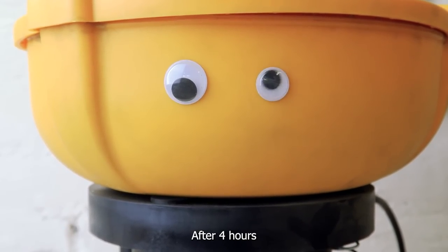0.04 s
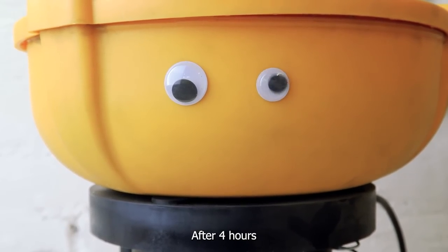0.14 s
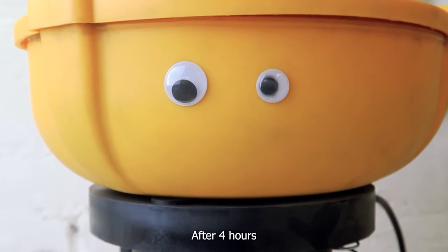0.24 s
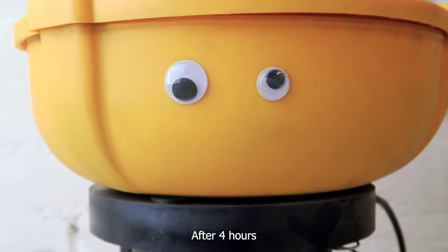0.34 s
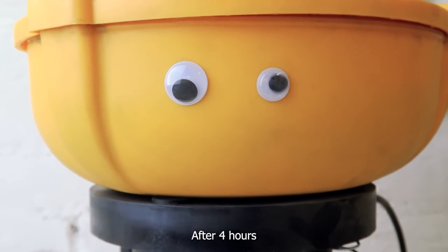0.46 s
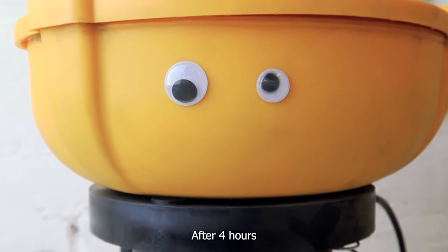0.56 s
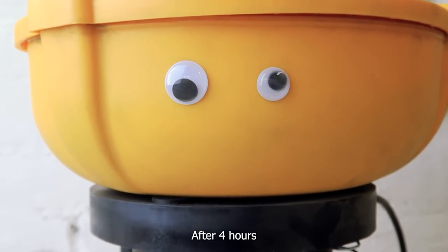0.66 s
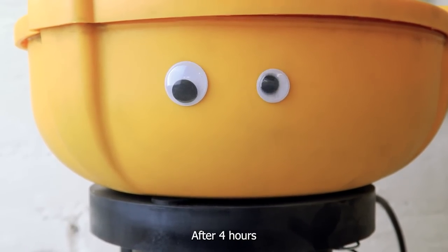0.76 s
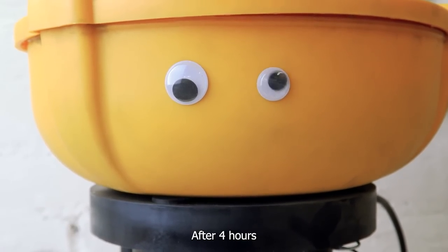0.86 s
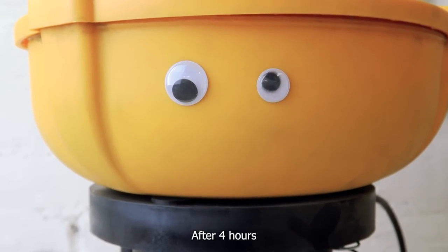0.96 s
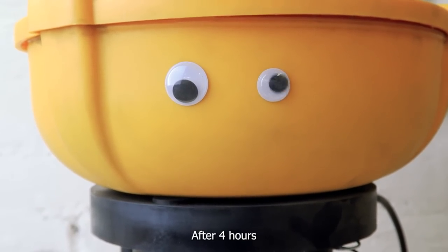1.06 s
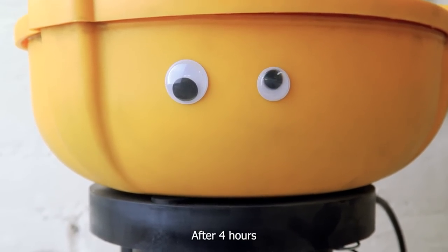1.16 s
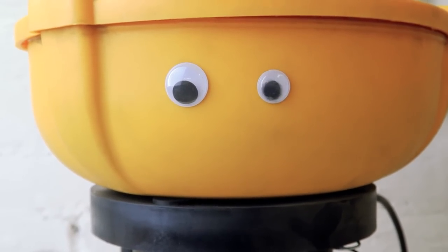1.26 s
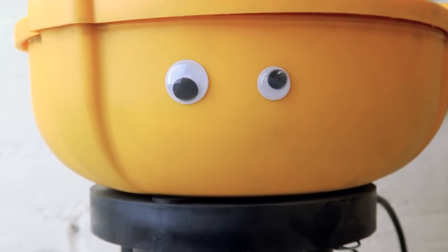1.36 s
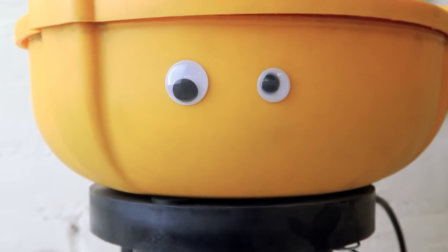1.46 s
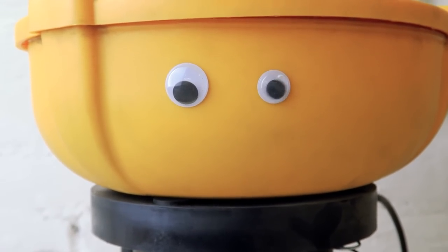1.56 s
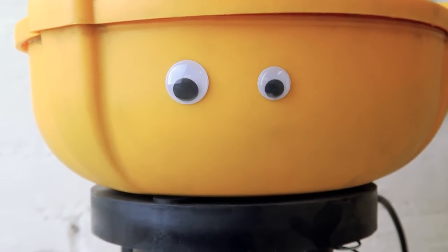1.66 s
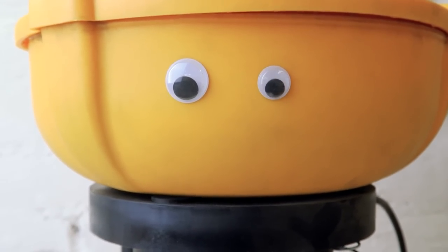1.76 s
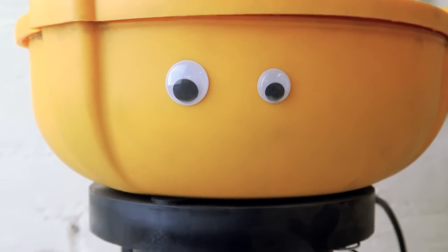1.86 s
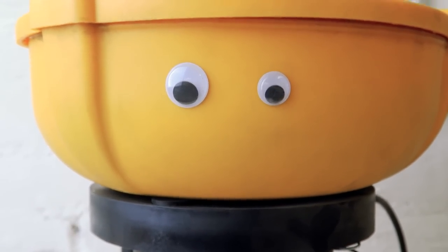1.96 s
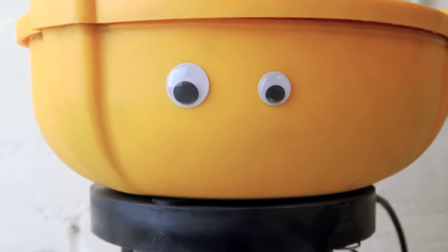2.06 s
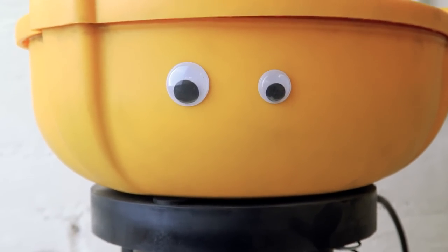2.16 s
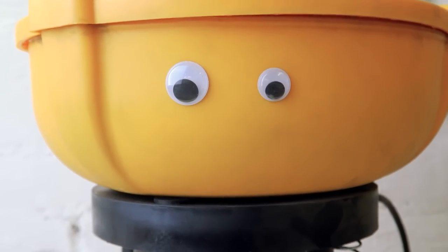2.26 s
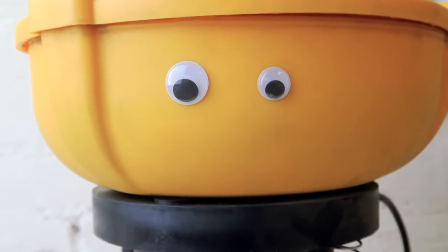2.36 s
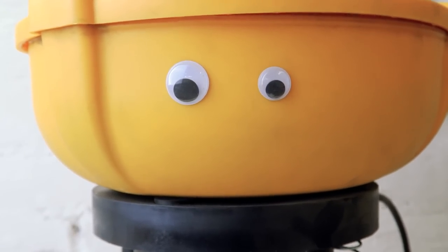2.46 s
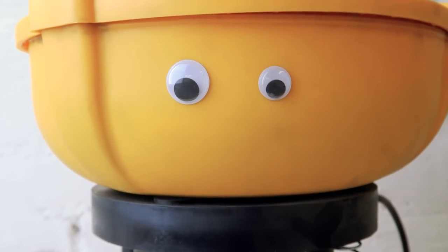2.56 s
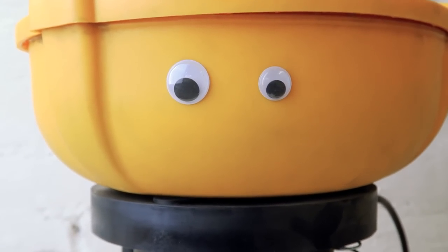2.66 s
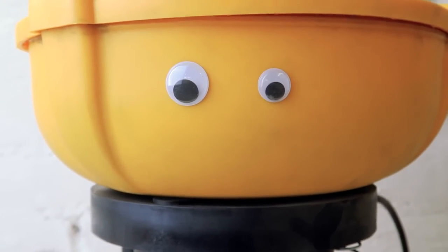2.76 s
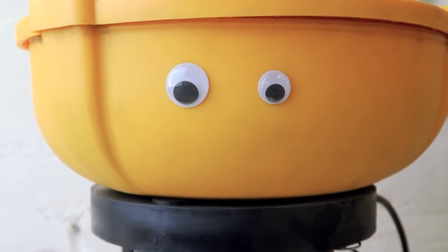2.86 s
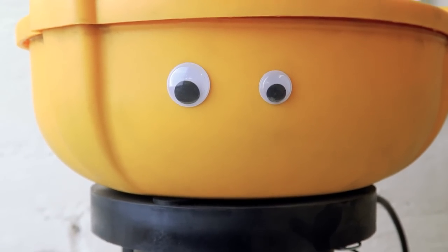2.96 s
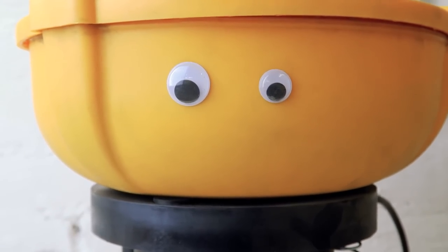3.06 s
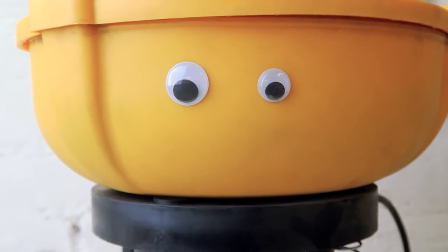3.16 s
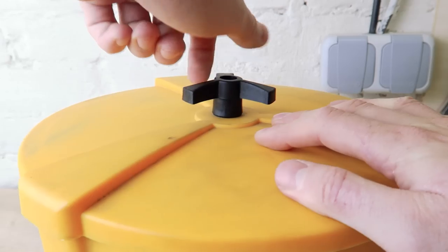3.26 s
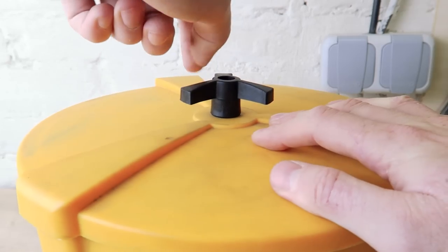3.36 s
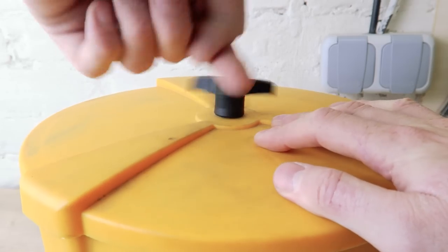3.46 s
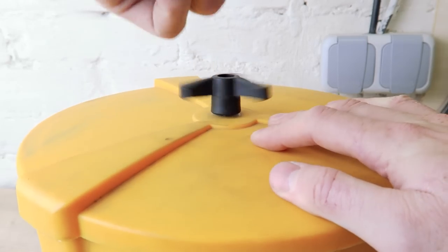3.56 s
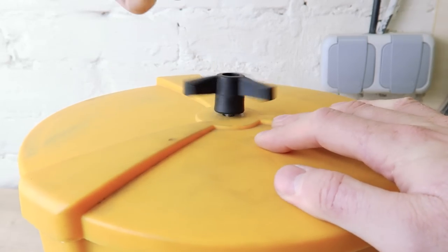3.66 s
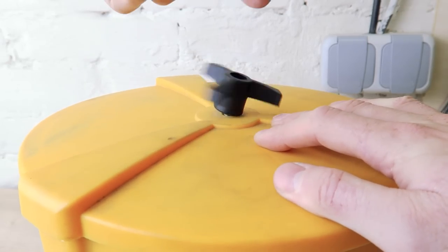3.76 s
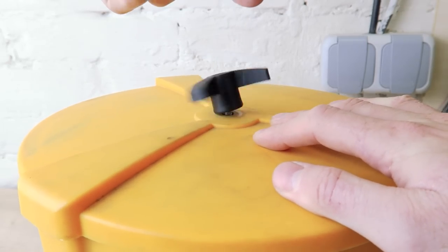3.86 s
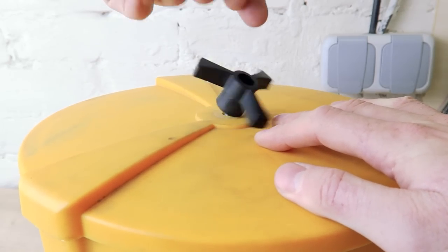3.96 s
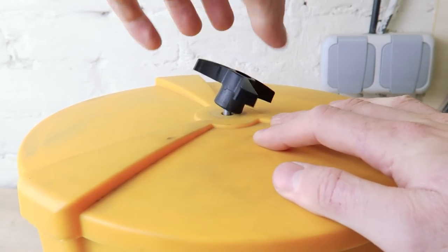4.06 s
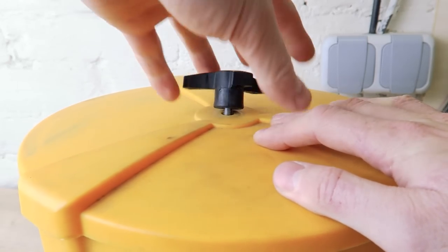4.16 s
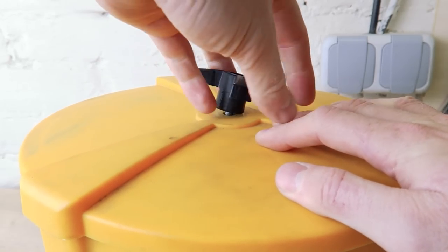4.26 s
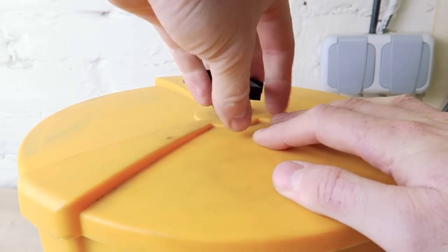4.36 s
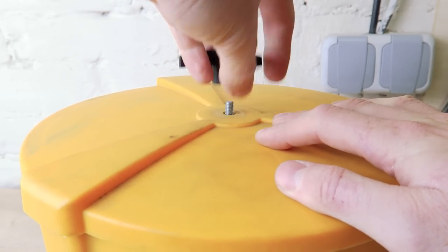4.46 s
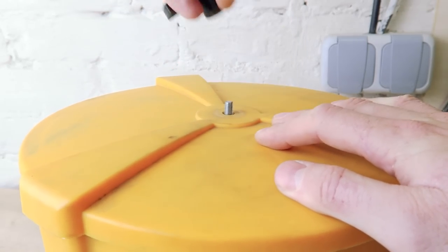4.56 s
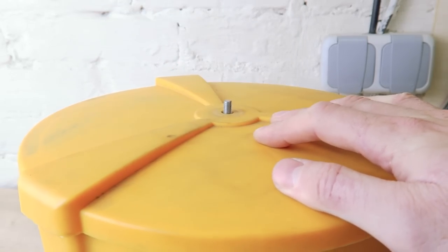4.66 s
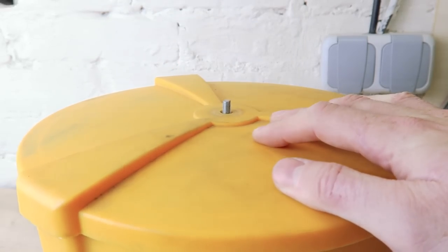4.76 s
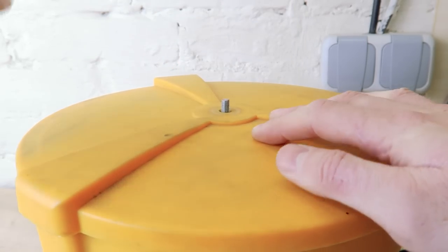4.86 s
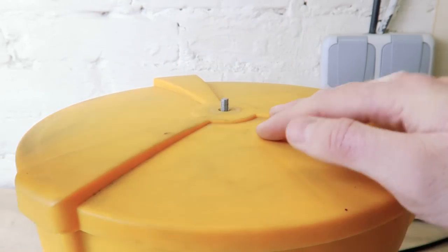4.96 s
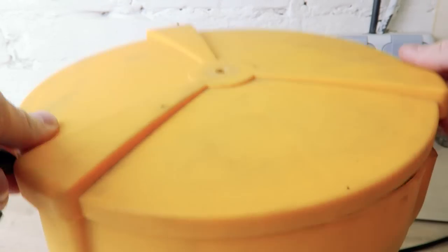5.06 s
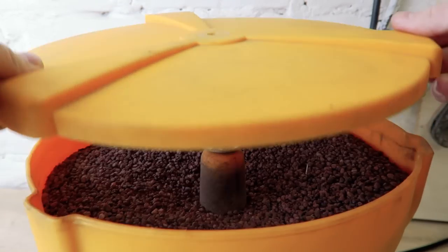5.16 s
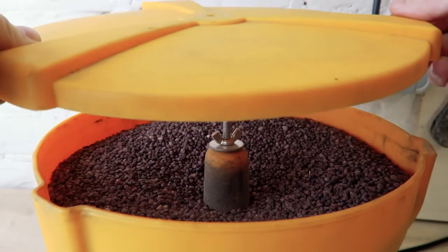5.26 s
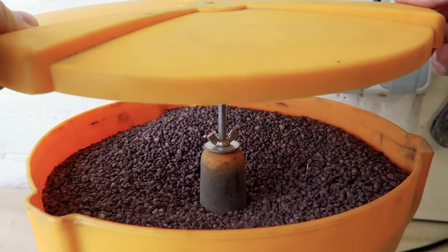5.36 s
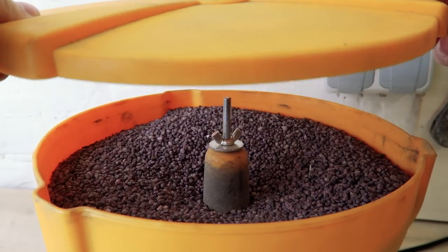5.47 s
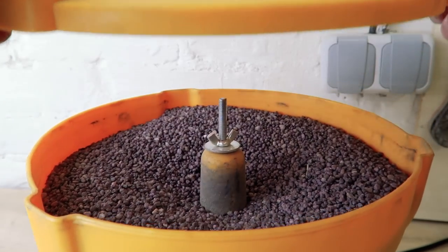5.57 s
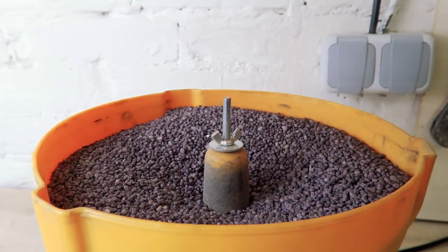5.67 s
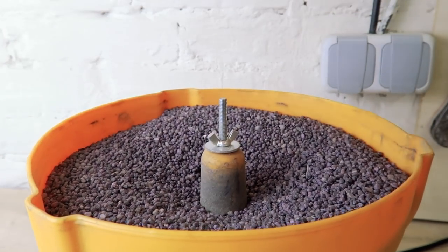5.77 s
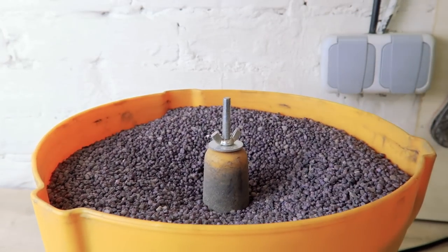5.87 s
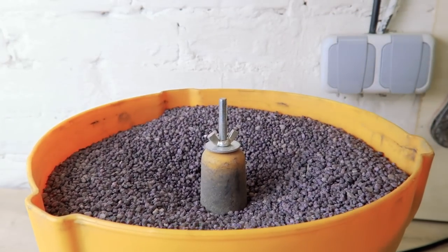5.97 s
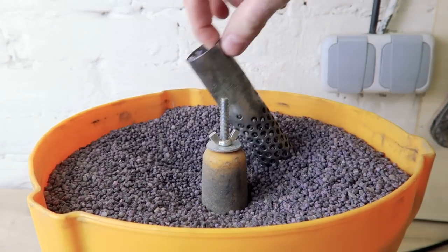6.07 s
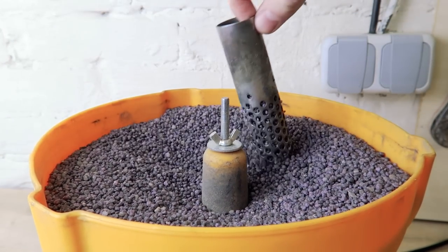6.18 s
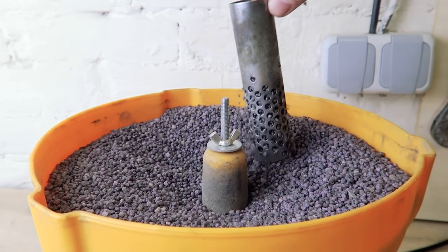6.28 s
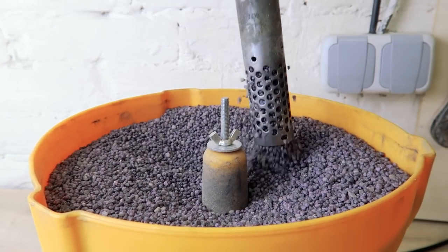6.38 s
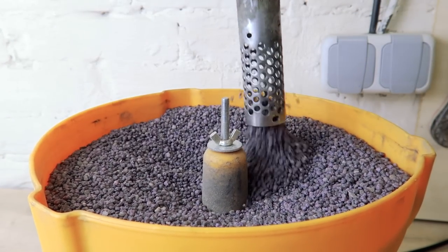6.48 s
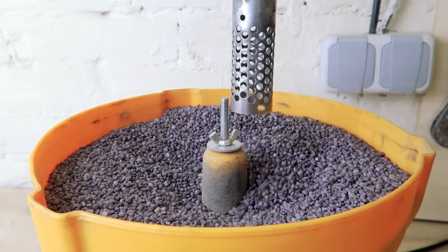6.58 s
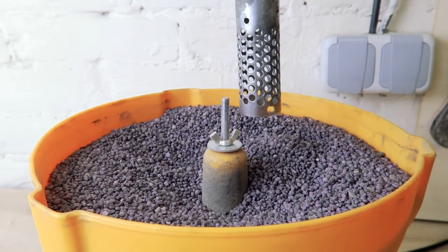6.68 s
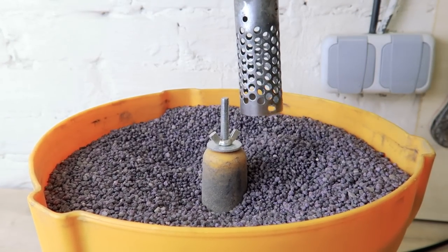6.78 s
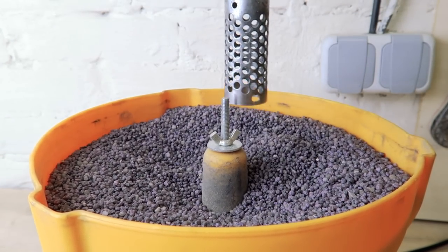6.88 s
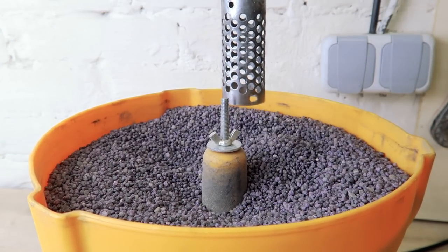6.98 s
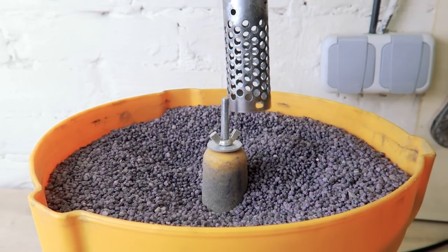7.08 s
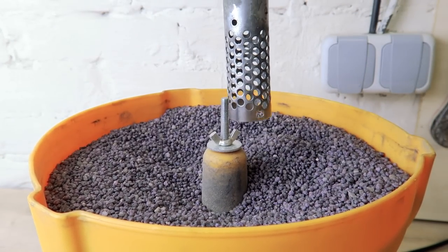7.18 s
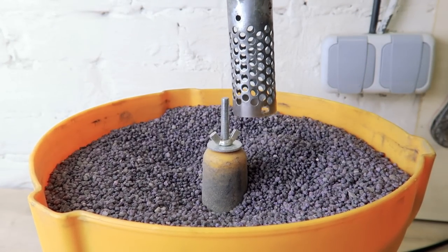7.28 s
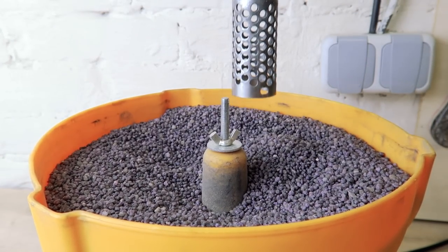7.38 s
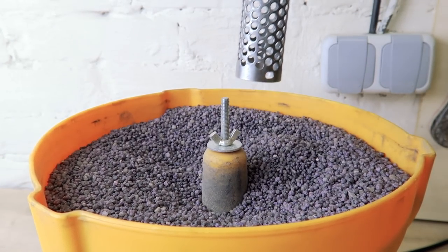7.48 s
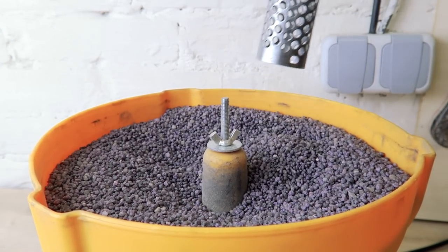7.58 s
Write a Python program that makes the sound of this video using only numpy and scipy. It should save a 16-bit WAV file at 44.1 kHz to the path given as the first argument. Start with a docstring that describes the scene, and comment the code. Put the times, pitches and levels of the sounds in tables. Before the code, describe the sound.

Steady motor hum with light ticks, then clattering nut and hollow plastic lid knocks, ending in a gritty rustle and a bright metallic ring.

```python
"""A vibratory tumbler hums on a workshop bench, close to the microphone, with light ticks and a small swish.
A wing nut is flicked loose, spins on its rod and clatters; the plastic lid is pulled off with a hollow knock.
Then a perforated steel tube is drawn out of gritty media, which pours through its holes and sets it ringing.
Blows and grains drive damped resonances, rubbing is dense random chatter, the motor is sines and coloured
noise, and a short room tail surrounds the handling."""
import sys
import numpy as np
from scipy import signal
from scipy.fft import rfft, irfft, next_fast_len
from scipy.io import wavfile
from scipy.ndimage import uniform_filter1d

SR = 44100
rng = np.random.default_rng(int(sys.argv[2]) if len(sys.argv) > 2 else 0)


def generate_wav(signal):
    """Clip the signal to [-1, 1] and save it as 16-bit WAV at the path in sys.argv[1]."""
    frames = np.transpose(np.atleast_2d(signal))
    scaled = np.clip(frames, -1, 1) * 32767
    pcm = np.round(scaled).astype(np.int16)
    wavfile.write(sys.argv[1], SR, pcm)


N = 336483
TIME = np.arange(N) / SR

# plastic lid on its bowl, well damped; also rubbed below: centre_hz, width_hz, level_db
LID_MODES = [(198, 16, -8), (330, 20, -6.5), (490, 30, -8), (672, 42, 0), (862, 45, 0), (1080, 90, -25),
             (1300, 80, -12), (1620, 70, -7), (1950, 110, -12), (2230, 110, -12), (2580, 140, -12),
             (3000, 150, -15), (3790, 200, -19), (5350, 240, -25), (6280, 280, -26)]
# knocks of nut, fingers and lid: the nut is flicked loose, runs off the thread and topples, is grabbed and
# picked up; the lid is gripped and pulled off. start_s, strongest_mode_hz, click_hz, level_db (relative),
# brightness_db_per_octave, hard_snap_db (relative)
KNOCKS = [ (3.554, 207, 385, -11, -2, -38), (3.562, 304, 392, -19.5, 2, -33),
          (3.828, 840, 2860, -40, 3, -72), (3.893, 356, 775, -25.5, -0.5, -61),
          (3.961, 856, 1650, -41, 2.5, -50), (4.038, 380, 1650, -27.5, 0.5, -63),
          (4.054, 430, 704, -27, -0.5, -61), (4.098, 190, 900, -31, -3, -60),
          (4.112, 657, 1900, -23, -1, -71), (4.122, 706, 760, -17, -2.5, -72),
          (4.14, 685, 850, -27.5, -2.5, -84), (4.152, 203, 650, -32, 0, -58),
          (4.32, 800, 1580, -23, 2, -40), (4.325, 355, 855, -17, 0, -30.5),
          (4.481, 814, 860, -35, 0.5, -61.5), (4.518, 814, 860, -40, 2, -59),
          (4.526, 670, 2600, -36, 1, -58.5), (4.541, 787, 790, -21, 1, -62),
          (4.554, 500, 550, -30.5, -0.5, -73), (4.783, 202, 2000, -48.5, 2.5, -52),
          (5.059, 497, 1700, -49.5, 3.5, -80.5), (5.116, 200, 331, -14, -1, -64.5),
          (5.127, 329, 655, -18.5, -1.5, -63), (5.146, 442, 700, -14.5, 1, -52.5),
          (5.151, 433, 430, -14, -1, -43.5)]
# edges of the four bands in which a knock is levelled: edge_hz
KNOCK_BAND_EDGES = [140, 450, 1200, 4500, 10000]
# balance shared by all knocks, from the low to the top band: level_db
KNOCK_BALANCE = [-1.5, -4, -11.5, -29.5]
# crowd of small lid and bowl modes: freq_hz, level_db (per Hz)
LID_BODY_SPECTRUM = [(250, 5.5), (520, 11), (820, 9), (2000, -10), (4000, -28)]
# crack of plastic: freq_hz, level_db (per Hz)
CRACK_SPECTRUM = [(500, 1), (2500, 7), (6000, -9), (10000, -27), (15000, -34.5)]
# hard edges meeting: freq_hz, level_db (per Hz)
SNAP_SPECTRUM = [(3000, -20.5), (6000, 0), (9000, 3.5), (12000, -3.5), (15000, -14)]
PIVOT_HZ = 695   # brightness tilts a blow's spectrum about this point


def knocks(main_db=10.5, main_width=69, thud_hz=633, thud_width=240, thud_db=26.5,
           click_damping=0.26, click_db=13, focus_db=7.0, crack_db=1.5, crack_t60=0.039,
           crack_rise=0.0039, snap_t60=0.039, detune=0.033, body_db=2.5, body_t60=0.15):
    """A contact gives a thud, a click, the lid's ring and a crack, strongest near its click; hard edges snap."""
    out, t = np.zeros(N + SR), np.arange(SR // 3) / SR
    attack = SR // 100   # samples: each band is levelled on its first 10 ms
    crack_onset = 1 - np.exp(-t / crack_rise)
    for s, main_hz, click_hz, level_db, brightness, snap_db in KNOCKS:
        hit = struck(t, thud_hz, thud_width, thud_db)
        hit += struck(t, click_hz, click_damping * click_hz, click_db)
        hit += struck(t, main_hz, main_width, main_db)
        for hz, width, db in LID_MODES:
            hit += mode_group(t, hz, width, db, detune, count=3)   # each spot wakes slightly different modes
        body = coloured(rng.standard_normal(len(t)), LID_BODY_SPECTRUM)
        hit += from_db(body_db - 60 * t / body_t60) * body
        hit *= 1 - np.exp(-t / 0.0014)   # plastic gives a little under the blow
        contact = rng.standard_normal(len(t))
        crack = coloured(contact, CRACK_SPECTRUM)
        hit += from_db(crack_db - 60 * t / crack_t60) * crack_onset * crack
        snap = rms_one(coloured(contact, SNAP_SPECTRUM))
        knock = from_db(snap_db - 60 * t / snap_t60) * crack_onset * snap
        for low, high, db in zip(KNOCK_BAND_EDGES, KNOCK_BAND_EDGES[1:], KNOCK_BALANCE):
            part, centre = band(hit, low, high), np.sqrt(low * high)
            tilt_db = brightness * np.log2(centre / PIVOT_HZ)
            near_click_db = focus_db * np.exp(-2 * np.log2(centre / click_hz) ** 2)
            gain = from_db(level_db + db + tilt_db + near_click_db)
            knock += gain * part / np.std(part[:attack])
        start = int(s * SR)
        out[start:start + len(t)] += knock
    return out[:N]


# the wing nut whirls up the thread, then wobbles at its end:
# start_s, length_s, rattle_db (relative), hiss_db (relative)
SPINS = [(3.56, 0.33, -42.5, -79), (3.89, 0.19, -39, -65.5)]
# nut and rod: centre_hz, width_hz, level_db
ROD_MODES = [(338, 68, 2), (860, 42, 2), (1230, 150, -10.5), (1653, 96, -4), (2070, 240, -20),
             (2580, 140, -13), (2940, 200, -16), (3840, 110, -17), (4410, 170, -20.5), (5700, 900, -28)]


def nut_spin():
    """The thread's chatter rattles nut and rod as the wing nut whirls."""
    return friction(SPINS, ROD_MODES, uneven_db=1.6, catch_db=-2, shift_db=3.0)


# fingers and parts drag on the lid: start_s, length_s, rattle_db (relative), hiss_db (relative)
RUBS = [(3.556, 0.017, -29.5, -53), (4.118, 0.017, -39, -80), (4.32, 0.02, -34.5, -70),
        (4.46, 0.081, -49.5, -75), (4.52, 0.014, -30, -80), (4.755, 0.02, -66.5, -60.5),
        (4.83, 0.04, -60.5, -88), (5.055, 0.082, -52, -81), (5.14, 0.044, -40.5, -69)]


def lid_rubbing():
    """Dragging fingers and parts excite the damped modes of the lid."""
    return friction(RUBS, LID_MODES, uneven_db=2.5, catch_db=-8.5, shift_db=3.5)


# hiss at the rubbing contact: freq_hz, level_db (per Hz)
CONTACT_HISS = [(2000, -15.5), (4500, 13.5), (8500, 13.5), (12000, 9.5), (15000, -2.5)]
RUB_ATTACK_S, RUB_RELEASE_DB_PER_S = 0.0027, 328


def friction(rows, modes, uneven_db, catch_db, shift_db):
    """Dense chatter with sparse catches rattles a body's modes in shifting balance and hisses at the contact."""
    rattle, hiss = 0, 0
    for s, length, rattle_db, hiss_db in rows:
        contact = stroke(s, length, RUB_ATTACK_S, RUB_RELEASE_DB_PER_S)
        rattle = rattle + from_db(rattle_db) * contact
        hiss = hiss + from_db(hiss_db) * contact
    catches = grains(per_s=90, spread_db=1.5)
    unevenness = from_db(uneven_db * (drift(70) + drift(20)))
    chatter = grains(per_s=2200, spread_db=3.5) * unevenness + from_db(catch_db) * catches
    body = 0
    for k, mode in enumerate(modes):
        body = body + (-1) ** k * from_db(shift_db * drift(25)) * resonate(chatter, [mode])
    rattling = rattle * rms_one(band(body, 180, 8200))
    return rattling + hiss * rms_one(coloured(chatter, CONTACT_HISS))


# the lid's rim slips off the bowl with a short groan: time_s, slips_per_s, level_db
RIM_GROAN = [(5.112, 172, -25.5), (5.121, 170, -17), (5.136, 168, -14.5), (5.18, 172, -44)]
# partials of the groan: multiple, level_db
GROAN_PARTIALS = [(2, -1.5), (3, -4), (4, -0.5)]
# air in the bowl as the lid opens: time_s, pitch_hz, level_db
BOWL_AIR = [(5.142, 412.6, -33), (5.151, 428, -8), (5.168, 414, -29.5), (5.25, 408.5, -36),
            (5.305, 431, -44), (5.38, 440, -75)]
# the freed lid rings faintly: time_s, pitch_hz, level_db
LID_RING = [(5.44, 680, -74), (5.452, 680, -60), (5.53, 675, -72)]
# faint high ticks as the lid clears the rod: start_s, level_db
ROD_TICKS = [(5.357, -69.5), (5.561, -64)]


def lid_lifting(tick_hz=7600, tick_width=1500, tick_t60=0.1):
    """The rim groans free, the bowl's air booms through the widening gap; the lid rings and grazes the rod."""
    groan = rough_tone(RIM_GROAN, rough_db=1.5, partials=GROAN_PARTIALS)
    boom = rough_tone(BOWL_AIR, rough_db=3.5, waver=.08)
    ring = rough_tone(LID_RING, rough_db=0.8)
    grazes = 0
    for s, level_db in ROD_TICKS:
        grazes = grazes + (TIME > s) * from_db(level_db - 60 * np.abs(TIME - s) / tick_t60)
    rod = rms_one(resonate(rng.standard_normal(N), [(tick_hz, tick_width, 0)]))
    return groan + boom + ring + grazes * rod


def rough_tone(rows, rough_db, waver=0.0151, partials=((1, 0),)):
    """A resonance or a run of slips kept sounding by uneven contact."""
    s, hz, db = np.transpose(rows)
    hz, db = np.interp(TIME, s, hz), np.interp(TIME, s, db)
    sounding = (TIME > s[0]) & (TIME < s[-1])
    phase = 2 * np.pi * np.cumsum(hz * (1 + waver * drift(110))) / SR
    level = from_db(db + rough_db * drift(110)) * np.sqrt(2)
    return sounding * level * sum(from_db(part_db) * np.sin(round(k) * phase) for k, part_db in partials)


# grit shifting around the tube: freq_hz, level_db (per Hz)
GRIT_SPECTRUM = [(400, -5), (1200, -6), (2100, 2), (3000, -4.5), (5000, -11.5), (9000, -6), (15000, -26.5)]
# grains landing on the heap: freq_hz, level_db (per Hz)
LANDING_SPECTRUM = [(400, -11), (1200, -2.5), (2500, -3.5), (4500, 2), (7000, -7), (10000, -4.5),
                    (15000, -17.5)]
# tube damped by the media: centre_hz, width_hz, level_db
BURIED_MODES = [(2050, 230, -12.5), (4300, 1800, -15), (6070, 110, 1.5), (6700, 280, 2.5), (7300, 390, 1.5),
                (7700, 200, -0.5), (8200, 250, -4), (8900, 230, -9), (9860, 410, -3), (10830, 250, -3),
                (12200, 980, -2), (12900, 250, -10.5), (13400, 300, -4.5), (13900, 260, -9),
                (14600, 350, -14)]
# the tube is pulled up, its holes clear the surface, it runs empty; the grains land a moment later
PULL_S, CLEAR_S, EMPTY_S, POUR_S, FALL_S = 6.105, 6.46, 6.595, 0.12, 0.085
POUR_ATTACK_S, POUR_RELEASE_DB_PER_S = 0.012, 268


def tube(grit_db=-57, landing_db=-49, scrape_db=-45, pour_db=-39.0, ring_db=-36, surge_db=1.3):
    """Grit scrapes the rising tube in small surges; falling grains then make it ring and land on the heap."""
    pull = stroke(PULL_S, EMPTY_S - PULL_S, attack_s=0.002, release_db_per_s=103.5)
    bared = stroke(PULL_S, CLEAR_S - PULL_S, attack_s=0.087, release_db_per_s=61.5) ** 2
    pour = stroke(CLEAR_S, POUR_S, attack_s=0.041, release_db_per_s=POUR_RELEASE_DB_PER_S)
    landing = stroke(CLEAR_S + FALL_S, POUR_S, attack_s=0.05, release_db_per_s=170.5)
    surge = from_db(surge_db * drift(60))
    grit = rms_one(coloured(surge * grains(per_s=1300, spread_db=1.0), GRIT_SPECTRUM))
    shifting = from_db(grit_db) * pull * grit
    heap = rms_one(coloured(grains(per_s=2200, spread_db=1.0), LANDING_SPECTRUM))
    heap = from_db(landing_db) * landing * heap
    contacts = grains(per_s=3500, spread_db=3.0)
    drive = np.hypot(from_db(scrape_db) * bared, from_db(pour_db) * np.hypot(pour, clink()))
    damped = drive * rms_one(resonate(surge * contacts, BURIED_MODES))
    ringing = from_db(ring_db) * tube_ring()
    return room(shifting + heap + damped, wet_db=-6.0) + room(ringing, wet_db=-9.5)


# tube hanging free: centre_hz, width_hz, level_db
FREE_MODES = [(5331, 5, -2.5), (6007, 7.5, -4.5), (6098, 26, -4), (6860, 25, -12), (7434, 22, -9),
              (7620, 30, -14), (9781, 4, -12), (10793, 7, 3), (10910, 12, -10), (11970, 35, -7),
              (12510, 26, -9.5)]
FILL_SHARPENS, DRAIN_S = 0.008, 0.14   # modes start sharp by this share and sink as the tube drains
MEDIA_DAMPING_HZ = 218   # extra width of every mode while the tube is full


def tube_ring(flicker_db=2.5):
    """Draining modes swell, narrow and sink, storing and leaking the grains' energy; blows jolt level and phase."""
    out, fill = 0, np.clip((EMPTY_S - TIME) / DRAIN_S, 0, 1) ** 2
    pour = stroke(CLEAR_S, EMPTY_S - CLEAR_S, POUR_ATTACK_S, POUR_RELEASE_DB_PER_S)
    blows = pour ** 2 + clink() ** 2
    for hz, width, db in FREE_MODES:
        choke = 1 + MEDIA_DAMPING_HZ * fill / width
        power, leak = blows / choke, 2 * np.pi * width / SR
        energy = signal.lfilter([leak], [1, leak - 1], power + 1e-18)
        fresh = np.minimum(power / energy, 1)   # share of the energy that has just arrived
        jolts = np.sqrt(leak * choke * fresh) * rng.standard_normal(N)
        turn = 2 * np.pi * hz * (1 + FILL_SHARPENS * fill) / SR
        level = np.sqrt(energy) * from_db(db + flicker_db * fresh * drift(50))
        out = out + level * np.sin(np.cumsum(turn + jolts))
    return out


CLINK_AT_S, CLINK_T60, CLINK_DB = 6.537, 0.05, 7.5   # start s, decay s, dB over the pour


def clink():
    """Gain of the one harder blow on the draining tube."""
    return (TIME > CLINK_AT_S) * from_db(CLINK_DB - 60 * np.abs(TIME - CLINK_AT_S) / CLINK_T60)


# light ticks of the shaking bowl:
# start_s, lowest_mode_hz, ring_db, ring_brightness_db_per_octave, snap_hz, snap_db
TICKS = [(1.524, 560, -55, -4, 2410, -56.5), (1.794, 475, -36, -5, 4260, -46.5),
         (1.862, 566, -39, -7, 3100, -35), (2.026, 551, -26.5, -6.5, 2500, -28.5),
         (2.115, 440, -38.5, -5, 1700, -54), (2.154, 494, -40, -9.5, 3570, -57),
         (2.208, 436, -42.5, -3.5, 1500, -54), (2.246, 520, -42, -8.5, 3140, -63.5),
         (2.714, 488, -35.5, -3.5, 1200, -48), (2.728, 504, -40, -4, 1200, -48),
         (2.759, 501, -42, -4.5, 1600, -53), (3.034, 484, -34.5, -3, 3240, -45),
         (3.079, 516, -43, 3.5, 3560, -48), (3.132, 480, -36, -0.5, 2980, -44)]
# the bowl's higher modes: centre_hz, width_hz, level_db
BOWL_MODES = [(1060, 28, -1), (1660, 42, -1.5), (2450, 70, -7), (3250, 90, -12)]
TICK_SNAP_DAMPING, TICK_DETUNE = 0.36, 0.045   # shares of the snap's and the mode's frequency


def ticks(low_width=22, snap_t60=0.037, snap_rise=0.00091, ring_rise=0.0013):
    """Each tick is a short pitched snap together with the ring of the bowl's modes."""
    out, t = np.zeros(N + SR), np.arange(SR // 3) / SR
    for s, low_hz, ring_db, brightness, snap_hz, snap_db in TICKS:
        ring = struck(t, low_hz, low_width, ring_db)
        for hz, width, db in BOWL_MODES:
            mode_db = ring_db + db + brightness * np.log2(hz / low_hz)
            ring += mode_group(t, hz, width, mode_db, TICK_DETUNE, count=6)
        contact = [(snap_hz, TICK_SNAP_DAMPING * snap_hz, 0)]
        snap = rms_one(resonate(resonate(rng.standard_normal(len(t)), contact), contact))
        snap *= from_db(snap_db - 60 * t / snap_t60) * (1 - np.exp(-t / snap_rise))
        start = int(s * SR)
        out[start:start + len(t)] += ring * (1 - np.exp(-t / ring_rise)) + snap
    return out[:N]


# swish of the circling pupil: freq_hz, level_db (per Hz)
SWISH_SPECTRUM = [(800, -32), (2200, 8), (5000, -1), (10500, -8), (13000, -19)]
SWISH_PER_S, SWISH_SLOWING_PER_S2 = 16.45, 2.0
SWISH_DB, SETTLE_AT_S, SETTLE_S, SETTLE_DB = -77, 1.678, 0.096, -63.5


def swish(depth_db=7.5, skip_db=-2):
    """A stick-on eye's loose pupil circles its capsule, swishing once a turn, slows and skips to rest."""
    turns = np.cumsum(SWISH_PER_S - SWISH_SLOWING_PER_S2 * TIME) / SR
    circling = from_db(SWISH_DB + depth_db * np.cos(2 * np.pi * turns)) * (TIME < SETTLE_AT_S)
    settling = from_db(SETTLE_DB) * stroke(SETTLE_AT_S, SETTLE_S, attack_s=0.0015, release_db_per_s=253)
    skips = grains(per_s=130, spread_db=1.5)
    slide = band(from_db(skip_db) * skips + from_db(-6) * rng.standard_normal(N), 2000, 11200)
    brushing = rms_one(coloured(stereo_noise(N), SWISH_SPECTRUM))
    return circling * brushing + room(settling * slide, wet_db=-3)


# hum partials: multiple, level_db (relative)
HUM_PARTIALS = [(1, 4), (3, -40), (6, -33.5)]
# the hum dips briefly: centre_s, half_width_s, depth_db
HUM_DIPS = [(0.89, 0.08, 4), (2.13, 0.056, 8.5), (5.179, 0.038, 10.5), (5.44, 0.066, 12.5),
            (6.78, 0.034, 7)]
# the bowl rocks harder on its springs: start_s, length_s, level_db
ROCKING_SWELLS = [(0.935, 0.13, -37), (3.3, 0.12, -43), (6.8, 0.36, -38)]
# bowl drone: freq_hz, level_db (per Hz, relative)
DRONE_SPECTRUM = [(20, -29), (38, -27), (60, -1), (115, 6), (140, -5), (190, -11.5), (230, -11.5),
                  (290, -4.5), (340, -20.5), (450, -54), (800, -65)]
# airy rush: freq_hz, level_db (per Hz, relative)
RUSH_SPECTRUM = [(200, -11), (380, 5), (500, -1), (590, 2.5), (700, -4), (1150, -10), (1500, -14.5),
                 (2600, -20), (4000, -27), (7000, -34), (11000, -42), (15000, -59.5)]
HUM_HZ = 99.8


def motor(waver=0.0019, flutter_db=0.5, rocking_hz=46, rocking_wander=0.15, rocking_sway_db=-1.0):
    """Magnetic hum at twice the mains rate, the bowl's slow rocking, and the drone and rush of running noise."""
    hum_db, drone_db, rush_db, rocking_db = machine_levels()
    dips_db = sum(depth * np.exp(-((TIME - s) / width) ** 2) for s, width, depth in HUM_DIPS)
    phase = 2 * np.pi * np.cumsum(HUM_HZ * (1 + waver * drift(5.2))) / SR
    hum = rms_one(sum(from_db(db) * np.sin(round(k) * phase) for k, db in HUM_PARTIALS))
    hum *= from_db(hum_db - dips_db + flutter_db * drift(14))
    rocking_phase = 2 * np.pi * np.cumsum(rocking_hz * (1 + rocking_wander * drift(4.9))) / SR
    rocking = np.sqrt(2) * np.sin(rocking_phase)
    swells = 0
    for s, length, db in ROCKING_SWELLS:
        swells = swells + from_db(db) * stroke(s, length, attack_s=0.039, release_db_per_s=111)
    rocking *= np.hypot(from_db(rocking_db + rocking_sway_db * drift(7.6)), swells)
    rumble = rms_one(coloured(stereo_noise(N), DRONE_SPECTRUM))
    upper = coloured(rumble, [(130, -40), (170, 0)])   # the two halves of the drone waver separately
    drone = from_db(drone_db + 3.2 * drift(12)) * (rumble - upper)
    drone = drone + from_db(drone_db + 2.7 * drift(14)) * upper
    rush = from_db(rush_db) * rms_one(coloured(stereo_noise(N), RUSH_SPECTRUM))
    return hum + rocking + drone + rush


# the machine's level in four stretches; the third begins as the lid comes off:
# start_s, hum_db, drone_db, rush_db, rocking_db, common_rise_db_per_s
MACHINE_STRETCHES = [(0.0, -38.4, -50.3, -59.3, -54, 0.2), (3.29, -34.4, -42.5, -60, -49, 0.6),
                     (5.15, -46.5, -60.5, -72.5, -62, 6.5), (6.105, -32.3, -41, -59.5, -52, -1.3)]
STRETCH_BLEND_S = 0.025


def machine_levels():
    """Levels in dB of hum, drone, rush and rocking, blended from stretch to stretch."""
    rows = np.array(MACHINE_STRETCHES)
    start, *levels, rise = rows[np.searchsorted(rows[1:, 0], TIME)].T
    return [uniform_filter1d(db + rise * (TIME - start), int(STRETCH_BLEND_S * SR)) for db in levels]


# decay time of the workshop: freq_hz, t60_s
ROOM_T60 = [(150, 0.48), (450, 0.2), (1500, 0.19), (5000, 0.14), (13000, 0.2)]


def room(x, wet_db):
    """Direct sound plus the workshop's diffuse tail, thin in the bass and decaying at a rate set by frequency."""
    t, edges = np.arange(SR // 2) / SR, np.geomspace(200, 18000, 9)
    noise = stereo_noise(len(t))
    tail = 0
    for low, high in zip(edges, edges[1:]):
        t60 = at_hz(ROOM_T60, np.sqrt(low * high))
        tail = tail + band(noise, low, high) * from_db(-60 * t / t60)
    tail = rms_one(tail * (t > .003)) / np.sqrt(len(t))
    return x + from_db(wet_db) * signal.fftconvolve(x[None], tail, axes=1)[:, :N]


# stereo width: freq_hz, side_to_mid_db
WIDTH = [(60, -41.5), (250, -11), (600, -9.5), (1400, -5), (3000, -4.5), (6000, -1.5), (12000, 2.5)]


def stereo_noise(size):
    """White noise, alike in both ears in the bass and wider in the treble."""
    mid, side = rng.standard_normal((2, size))
    return mid + coloured(side, WIDTH) * [[1], [-1]]


def struck(t, hz, width, db):
    """One struck mode dying away."""
    return from_db(db) * np.sin(2 * np.pi * hz * t) * np.exp(-np.pi * width * t)


def mode_group(t, hz, width, db, spread, count):
    """Several close modes struck together; they beat and blur into one broad resonance."""
    shifts, signs = rng.standard_normal(count), rng.choice([-1, 1], count)
    group = sum(sign * struck(t, hz * (1 + spread * shift), width, db) for shift, sign in zip(shifts, signs))
    return rms_one(group) * np.std(struck(t, hz, width, db))


def resonate(x, modes):
    """Parallel resonances of alternating sign, each with its dB on top."""
    out = 0
    for k, (hz, width, db) in enumerate(modes):
        r = np.exp(-np.pi * width / SR)
        zeros = np.array([1, 0, -1]) * (1 - r * r) / 2
        poles = [1, -2 * r * np.cos(2 * np.pi * hz / SR), r * r]
        out = out + (-1) ** k * from_db(db) * signal.lfilter(zeros, poles, x + 1e-18)
    return out


def grains(per_s, spread_db):
    """Random tiny collisions of uneven size; rms 1."""
    sizes = from_db(spread_db * np.minimum(rng.exponential(1, N), 4)) * rng.choice([-1, 1], N)
    return rms_one(sizes * (rng.random(N) < per_s / SR))


def stroke(start, length, attack_s, release_db_per_s):
    """Gain that rises, holds and dies away."""
    t = np.maximum(TIME - start, 0)
    return (1 - np.exp(-t / attack_s)) * from_db(-release_db_per_s * np.maximum(t - length, 0))


def drift(rate):
    """Random wander of rms 1 with `rate` knots per second."""
    knots = rng.standard_normal(int(rate * N / SR) + 2)
    return rms_one(np.interp(TIME * rate, np.arange(len(knots)), knots))


def coloured(x, spectrum):
    """Give a signal a smooth spectrum."""
    size = next_fast_len(x.shape[-1])
    gain = from_db(at_hz(spectrum, np.fft.rfftfreq(size, 1 / SR)))
    return irfft(rfft(x, size) * gain, size)[..., :x.shape[-1]]


def at_hz(points, hz):
    """Read a spectrum on a log-frequency axis."""
    f, value = np.transpose(points)
    return np.interp(np.log(np.maximum(hz, 1)), np.log(f), value)


def band(x, low, high):
    """Steep causal band-pass."""
    return signal.sosfilt(signal.butter(3, [low, high], "band", fs=SR, output="sos"), x)


def from_db(db):
    """Decibels to gain."""
    return 10 ** (np.asarray(db) / 20)


def rms_one(x):
    """Scale to rms 1."""
    return x / np.sqrt(np.mean(x ** 2) + 1e-20)


def scene():
    """Everything stands close to the microphone in one small room."""
    handling = from_db(-3.0) * (knocks() + nut_spin() + lid_rubbing())
    foreground = room(handling, wet_db=-4.5) + lid_lifting() + tube()
    return foreground + room(ticks(), wet_db=1.0) + swish() + motor()


CUTOFF_HZ = 15600


def record(dry):
    """Peaks stop at full scale, then the top is cut."""
    low_pass = signal.ellip(10, .1, 80, CUTOFF_HZ, fs=SR, output="sos")
    return signal.sosfilt(low_pass, np.clip(dry, -1, 1))


dry = scene()
out = record(dry)
generate_wav(out)
```